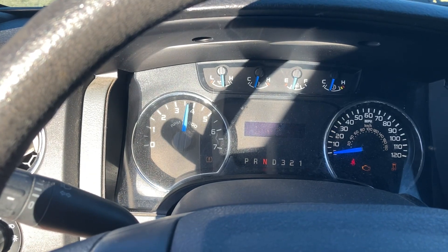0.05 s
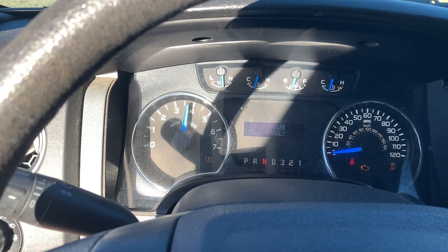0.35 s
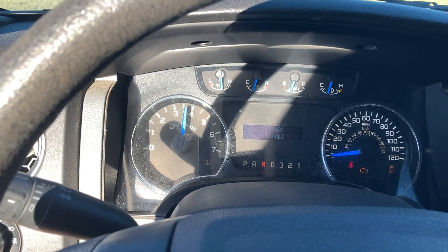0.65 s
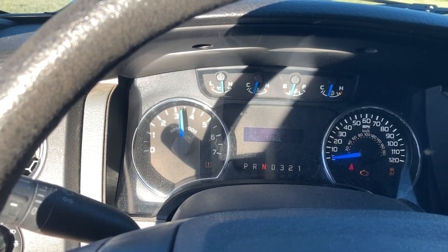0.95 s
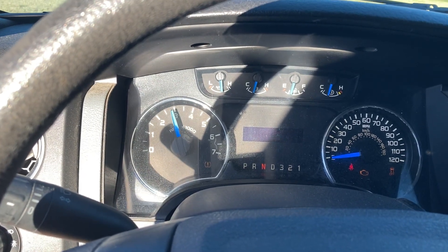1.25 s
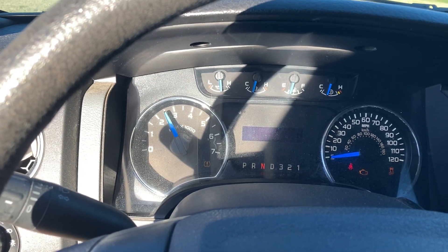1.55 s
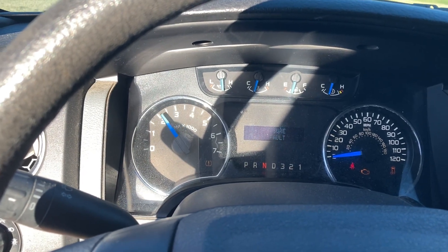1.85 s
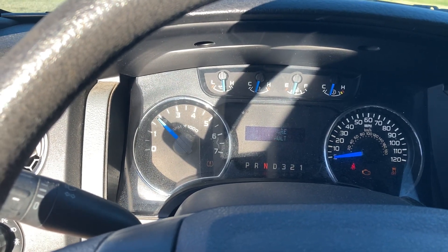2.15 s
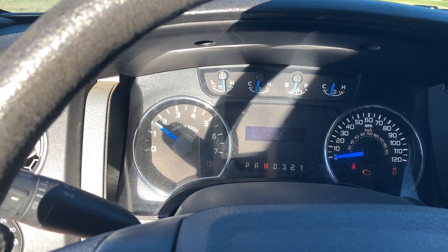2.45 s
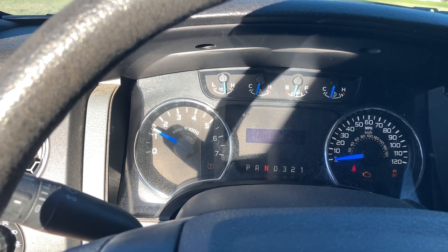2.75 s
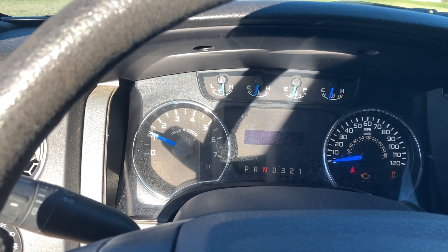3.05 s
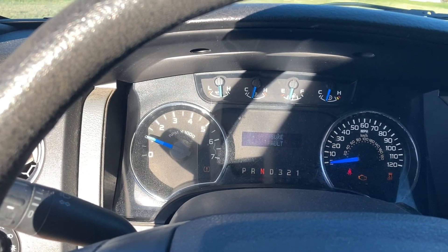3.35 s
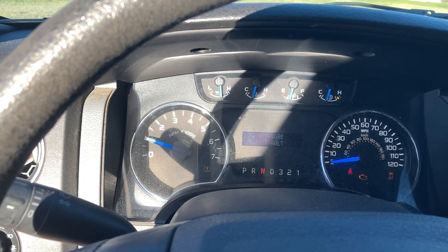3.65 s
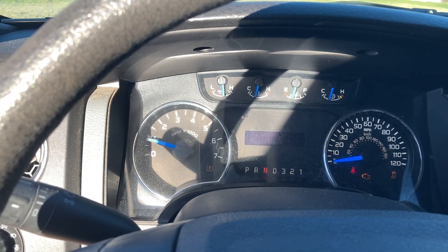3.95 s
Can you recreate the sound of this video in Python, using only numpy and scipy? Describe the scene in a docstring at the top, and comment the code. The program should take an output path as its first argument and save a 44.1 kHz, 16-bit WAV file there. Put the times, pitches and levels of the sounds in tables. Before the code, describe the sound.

A vehicle engine holds high revs with a whining buzz, then the throttle shuts and it winds down to a low idle. Heard from the driver's seat, with a low cabin boom and a few small plastic ticks.

```python
"""A V8 in neutral, taken with a stereo pair at the driver's seat. It opens held at about 3700 rpm:
exhaust orders, valve buzz, belt whines, ringing casings and fan whirr over the cabin's low boom.
Within the first second the throttle shuts; orders and whines sink together and the whirr fades.
From about 1 s, small plastic ticks sound close by, dull puffs of air shake the cabin and the third
order drones. After 2 s the boom comes in lurches as the engine winds down to a 900 rpm idle."""
import sys
import numpy as np
from scipy import signal
from scipy.io import wavfile

SR = 44100
rng = np.random.default_rng(int(sys.argv[2]) if len(sys.argv) > 2 else 0)


def put_to_file(sound):
    """Save the sound as 16-bit audio at rate SR, in the file named by the first command-line argument."""
    columns = np.atleast_2d(sound).T  # one column per channel
    safe = np.clip(columns, -1, 1)
    whole_steps = np.round(safe * 32767)
    wavfile.write(sys.argv[1], SR, whole_steps.astype(np.int16))


N = 176400
T = np.arange(N) / SR
FULL_HZ = 30.8   # four-stroke cycles a second at full speed; an order is a multiple of the cycle rate
RELEASE_S = (.65, .92)   # the throttle closes between these times
RIGHT_LAG_S = 0.00028   # the engine reaches the left microphone first


def from_db(db):
    """Decibels to gain."""
    return 10 ** (np.asarray(db) / 20)


def rms_one(x):
    """Scale to unit rms."""
    return x / np.sqrt(np.mean(x ** 2) + 1e-20)


def in_time(rows):
    """Join (t/s, value) rows by straight lines."""
    return np.interp(T, *np.transpose(rows))


def at_hz(rows, hz):
    """Read every column of a table on a log-frequency axis."""
    f, *columns = np.transpose(rows)
    return [np.interp(np.log(hz), np.log(f), c) for c in columns]


def filtered(x, hz, kind, order=2):
    """Butterworth filter."""
    sos = signal.butter(order, np.clip(hz, 10, .45 * SR), kind, fs=SR, output="sos")
    return signal.sosfilt(sos, x)


def drift(hz):
    """Smooth random wander of spread 1."""
    pole = np.exp(-200 * np.pi * hz / SR)   # one step per 100 samples
    steps = rng.standard_normal(N // 100 + 1002)
    slow = signal.lfilter([1], [1, -2 * pole, pole * pole], steps)[1000:]
    return np.interp(np.arange(N) / 100, np.arange(len(slow)), rms_one(slow))


# The cabin at the microphones: f/Hz, share common to both (0-1), left minus right/dB
CABIN_IMAGE = [(62, 0.85, -3), (129, 0.4, 1.2), (282, 0.99, 0.5), (700, 0.61, 4.5), (1390, 0.37, 1.5),
               (2820, 0.08, -0.5), (5500, 0.7, -0.5), (10100, 1, -0.5)]


def panned(pair, hz):
    """Left-right balance of the cabin at this pitch."""
    return pair * from_db(at_hz(CABIN_IMAGE, hz)[1] * np.array([[.5], [-.5]]))


def stereo_noise(hz):
    """White noise, partly common to both microphones and later on the right."""
    share = at_hz(CABIN_IMAGE, hz)[0]
    common = rng.standard_normal(N)
    direct = np.array([common, np.roll(common, round(RIGHT_LAG_S * SR))])
    diffuse = rng.standard_normal((2, N))
    return panned(np.sqrt(share) * direct + np.sqrt(1 - share) * diffuse, hz)


def tone(cycles, order, db, phase=0):
    """One engine order; reflections scatter its phase between the microphones."""
    hz = order * FULL_HZ
    scatter = (1 - at_hz(CABIN_IMAGE, hz)[0]) * rng.standard_normal((2, 1))
    angle = 2 * np.pi * order * cycles + phase + scatter
    return panned(np.sqrt(2) * from_db(db) * np.sin(angle), hz)


# Leading orders at the seat, swelling as they cross cabin resonances: t/s, level/dB
CRANK_ORDER_2 = [(0, -21), (.18, -62), (.28, -27.5), (.5, -43), (.72, -26.5), (.83, -23), (.93, -40),
                 (1.01, -17), (1.1, -31.5), (1.26, -19.5), (1.43, -47), (2.1, -54.5), (2.5, -43)]
DRONE_ORDER_3 = [(0, -50), (.13, -27), (.55, -30), (.86, -42), (.95, -24), (1.01, -41), (1.09, -23),
                 (1.25, -22.5), (1.38, -15), (1.6, -16.5), (2.0, -14.5), (2.1, -24.5), (2.18, -21),
                 (2.3, -47), (2.8, -42)]
ORDER_6 = [(0, -41.5), (.4, -41.5), (.58, -37), (.8, -40), (.95, -44.5), (1.2, -55), (1.62, -44),
           (1.78, -31.5), (2.0, -29), (2.1, -37), (2.3, -46.5)]
FIRING_ORDER_8 = [(0, -31), (.72, -32.5), (.83, -41.5), (.91, -48.5), (.96, -31.5), (1.04, -37.5),
                  (1.09, -51), (1.15, -38), (1.22, -33), (1.3, -45.5), (1.42, -47.5), (2.0, -40.5),
                  (2.4, -49), (3.3, -55), (4, -37)]
# Lesser orders at full speed, before the load gain: order, level/dB
LESSER_ORDERS = [(4, -43), (5, -45.5), (7, -39), (9, -46), (10, -44.5), (11, -46), (12, -54), (13, -43.5),
                 (14, -54), (15, -55), (16, -52), (17, -55), (18, -60), (23, -56), (24, -55), (29, -59),
                 (45, -59), (47, -58), (64, -60)]
# Lesser orders and valve buzz dip as the throttle closes, then recover: t/s, gain/dB
LOAD_GAIN = [(0, -1), (.5, -1.5), (.72, -2), (.92, -9.5), (4, -1.5)]
ORDER_FALL_DB, WAVER_DB = 22, 2.2   # loss per halving of speed; slow wander in level
ROUGH_DB, ROUGH_RADIANS, ROUGH_HZ = 3.5, .45, 22


def exhaust(cycles, halvings):
    """Orders of the uneven firing pattern throb once a cycle and turn ragged as the throttle shuts."""
    overrun = np.interp(T, RELEASE_S, (0, 1))

    def ragged(order, db, phase=0):
        """One order that stumbles in strength and timing on the overrun."""
        stumble_db = overrun * ROUGH_DB * drift(ROUGH_HZ)
        stumble_phase = overrun * ROUGH_RADIANS * drift(ROUGH_HZ)
        return tone(cycles, order, db + stumble_db, phase + stumble_phase)

    out = tone(cycles, 2, in_time(CRANK_ORDER_2)) + tone(cycles, 3, in_time(DRONE_ORDER_3))
    out += ragged(6, in_time(ORDER_6)) + ragged(8, in_time(FIRING_ORDER_8))
    effort_db = in_time(LOAD_GAIN) - ORDER_FALL_DB * halvings
    for order, db in LESSER_ORDERS:
        out += ragged(order, db + effort_db + WAVER_DB * drift(hz=5), phase=.8 * rng.standard_normal())
    return out


# Buzz through the engine's covers at full speed, before the load gain: f/Hz, level per order/dB
COVER_RESPONSE = [(600, -61), (1000, -64), (1180, -61.5), (1400, -55), (1550, -64.5), (1900, -60),
                  (2600, -69.5), (4000, -80.5)]
BUZZ_FALL_DB = 24   # per halving of speed


def valve_train(cycles, halvings):
    """A comb of high orders; each swells as it slides through the resonance of the engine's covers."""
    effort_db = in_time(LOAD_GAIN) - BUZZ_FALL_DB * halvings
    wavers = [from_db(effort_db + WAVER_DB * drift(hz=3.8)) for _ in range(5)]
    cycle_hz = FULL_HZ / 2 ** halvings[::100]
    out = 0
    for order in range(19, 131):
        cover_db = at_hz(COVER_RESPONSE, order * cycle_hz)[0]
        strength = np.repeat(from_db(cover_db), 100)[:N] * wavers[order % len(wavers)]
        partial = tone(cycles, order, db=1.8 * rng.standard_normal(), phase=rng.uniform(0, 2 * np.pi))
        out += strength * partial
    return out


# Pulley whines at full speed: f/Hz, level/dB, held until t/s
PULLEY_WHINES = [(356, -47.5, .52), (646.5, -51, .36), (1116, -46.5, .76), (1139, -55, .45),
                 (1302, -46, .45), (1879, -60.5, .4), (3400, -67, .5), (3881, -66, .6)]
WHINE_FALL_DB = 14   # per halving of speed
WHINE_DROP_DB, WHINE_FADE_S = 10, .12   # once the hold ends


def belt_drive(cycles, halvings):
    """Pulleys whine at fixed ratios to the crank; each holds, then drops away."""
    ahead = cycles[0] + .7 * (cycles - cycles[0])   # nearly straight ahead of the pair: less lag
    out = 0
    for hz, db, hold_s in PULLEY_WHINES:
        loss_db = WHINE_FALL_DB * halvings + WHINE_DROP_DB * np.clip((T - hold_s) / WHINE_FADE_S, 0, 1)
        whine = np.sqrt(2) * np.sin(2 * np.pi * hz / FULL_HZ * ahead)
        out += panned(whine * from_db(db - loss_db + 1.2 * drift(hz=4)), hz)
    return out


# Casing and panel modes: f/Hz, width/Hz, unloaded level at full speed/dB, loss per halving of speed/dB
CASING_MODES = [(200, 5, -43, 9), (342.3, 26, -56, 1), (582.5, 13, -58, 6), (691, 110, -56, 7),
                (1086, 22, -56, 7.5), (1235, 100, -55, 10.5), (1312, 63, -47.5, 9), (1540, 100, -68.5, 8),
                (1830, 110, -61.5, 8), (2040, 150, -64, 6.5), (2462, 160, -60, 12.5), (2844, 110, -70, 6),
                (3040, 22, -69, 5.5), (3385, 76, -65.5, 7), (3890, 60, -65.5, 13), (4594, 110, -63.5, 10.5),
                (4650, 83, -77.5, 13)]
SHAKE_DEPTH, CASING_SWELL_DB, CASING_LOADED_DB = 0.44, 2.5, -4.5


def casing(cycles, halvings):
    """Each firing shakes the metal parts, which ring at the same pitches at any speed."""
    shake = 1 + SHAKE_DEPTH * np.cos(2 * np.pi * 8 * cycles)
    out = 0
    for hz, width_hz, db, fall_db in CASING_MODES:
        edges = [hz - width_hz / 2, hz + width_hz / 2]
        ring = filtered(stereo_noise(hz) * shake, edges, "band", order=1)
        ring = filtered(ring, [hz / 1.1, hz * 1.1], "band", order=1)
        out += from_db(db - fall_db * halvings + CASING_SWELL_DB * drift(hz=4)) * rms_one(ring)
    return out * from_db(np.interp(T, RELEASE_S, (CASING_LOADED_DB, 0)))   # looser off the throttle


# Fan and valve-train noise: f/Hz, level in 1 Hz at full speed/dB, loss per halving of speed/dB
WHIRR_SPECTRUM = [(103, -56, 6), (151, -61, 9.5), (200, -70, 3), (308, -71.5, 5.5), (570, -77.5, 7),
                  (760, -75.5, 5.5), (1020, -73.5, 13), (1320, -76, 11.5), (1840, -80.5, 10.5),
                  (2950, -87, 12.5), (4230, -92, 12.5), (6050, -96, 15.5), (7200, -98.5, 15),
                  (10700, -103, 14.5), (15700, -107, 13.5)]
# Rise and fall on top of that spectrum: t/s, gain/dB
WHIRR_GAIN = [(0, 0), (.4, -0.5), (.9, 2), (1.4, 1.5), (2.0, 2), (2.4, 1), (3.0, 0), (3.19, 3), (3.22, 1),
              (3.26, 4), (3.5, 4), (4, 5.5)]
FLICKER_DB, FLICKER_HALVED_HZ = 2.56, 21000   # higher bands are smoother


def whirr(cycles, halvings):
    """Fan and mechanical noise, pulsing with the firings and duller as the speed falls."""
    edges = 80 * 2 ** np.arange(0, 7.8, 1 / 3)   # third octaves
    out = 0
    for low, high in zip(edges, edges[1:]):
        hz = np.sqrt(low * high)
        db, fall_db = at_hz(WHIRR_SPECTRUM, hz)
        band = filtered(stereo_noise(hz), [low, high], "band", order=3) * np.sqrt(SR / 2)
        flicker_db = FLICKER_DB * drift(hz=22) / (1 + hz / FLICKER_HALVED_HZ)
        out += band * from_db(db - fall_db * halvings + flicker_db)
    firing_pulse = 0.056 * np.cos(2 * np.pi * 8 * cycles)
    cycle_throb = 0.076 * np.cos(2 * np.pi * cycles)
    return out * from_db(in_time(WHIRR_GAIN)) * (1 + firing_pulse + cycle_throb)


# Boom around the microphones, smooth up to 2.1 s and lurching after: t/s, level/dB
BOOM_SMOOTH = [(0, -37), (.6, -31), (1.0, -30), (1.25, -29), (1.45, -34), (1.9, -33), (2.1, -27)]
BOOM_LURCHING = [(2.2, -26), (2.22, -29.5), (2.28, -25.5), (2.354, -44.5), (2.53, -20.5), (2.6, -35.5),
                 (2.66, -20.5), (2.736, -29.5), (2.766, -46), (2.846, -28.5), (2.9, -38.5), (2.966, -30),
                 (2.992, -37), (3.146, -22.5), (3.176, -46), (3.236, -49), (3.288, -32), (3.362, -43),
                 (3.462, -35), (3.528, -36.5), (3.588, -26), (3.794, -37), (3.814, -70), (3.858, -49),
                 (3.904, -26.5), (4.0, -37.5)]
BOOM_HZ, BOOM_WIDTH_HZ, BOOM_EVENNESS = 58.56, 22.8, 0.41


def cabin_boom():
    """The cabin's lowest air resonance, stirred at random."""
    edges = [BOOM_HZ - BOOM_WIDTH_HZ / 2, BOOM_HZ + BOOM_WIDTH_HZ / 2]
    ring = signal.hilbert(filtered(stereo_noise(BOOM_HZ), edges, "band"))
    swell = np.sqrt(np.mean(np.abs(ring) ** 2, axis=0))
    evened = ring.real / (swell + 0.041 * swell.mean()) ** BOOM_EVENNESS
    evened = filtered(evened, [BOOM_HZ / 2, 2 * BOOM_HZ], "band")
    return rms_one(evened) * from_db(in_time([*BOOM_SMOOTH, *BOOM_LURCHING]))


# Ticks close to the microphones: t/s, level before filtering/dB, lower f/Hz, upper f/Hz, t60/s
CLOSE_TICKS = [(.939, -40.5, 2000, 5000, .018), (1.084, -37, 2200, 18000, .007),
               (1.27, -54, 4000, 16000, .01), (1.446, -42, 900, 6000, .014), (2.346, -51, 900, 6000, .016),
               (2.633, -48, 900, 7000, .016), (2.645, -58, 1500, 7000, .012),
               (3.185, -39.5, 600, 2300, .018), (3.186, -50, 4000, 14000, .007),
               (3.192, -47, 700, 2600, .03)]


def plastic_ticks():
    """Tiny dry contacts of plastic that die at once."""
    out = 0
    for start_s, db, low_hz, high_hz, t60 in CLOSE_TICKS:
        decay = (T >= start_s) * from_db(-60 * np.clip((T - start_s) / t60, 0, 3))
        burst = filtered(stereo_noise(high_hz) * decay, [low_hz, high_hz], "band", order=1)
        burst = filtered(burst, 2 * high_hz, "low", order=1)
        out += from_db(db) * np.sqrt(SR / 2 / high_hz) * burst
    return filtered(out, 400, "high")   # nothing deeper rings in them


# Dull puffs in the cabin: centre t/s, half length/s, level/dB, upper f/Hz
CABIN_PUFFS = [(1.014, 0.046, -29, 147), (1.225, 0.036, -35.5, 258), (1.356, 0.012, -27.5, 175),
               (1.5, .07, -33, 110), (1.65, 0.04, -37, 199), (1.89, 0.044, -36, 132),
               (2.077, 0.043, -23.5, 190), (2.25, 0.027, -32, 170), (2.532, 0.019, -24.5, 108),
               (2.644, 0.0089, -21, 182), (2.696, 0.035, -33.5, 175), (3.042, 0.014, -42, 227),
               (3.068, 0.018, -35, 150), (3.123, 0.0096, -27, 155)]
PUFF_LOW_HZ = 71


def air_puffs():
    """Short swells of low turbulence."""
    out = 0
    for centre_s, half_s, db, high_hz in CABIN_PUFFS:
        swell = np.exp(-.5 * ((T - centre_s) / half_s) ** 2)
        air = filtered(stereo_noise(high_hz), high_hz, "low", order=3)
        puff = filtered(air, PUFF_LOW_HZ, "high") * swell
        crest_rms = np.sqrt(np.mean(puff ** 2) / np.mean(swell ** 2))
        out += from_db(db) * puff / crest_rms
    return out


# Engine speed, held and then winding down: t/s, four-stroke cycle rate f/Hz
CYCLE_RATE = [(0, 30.75), (.42, 30.8), (.6, 30.2), (.74, 29.4), (.86, 27.8), (1.0, 26.2), (1.09, 25.0),
              (1.24, 23.5), (1.43, 21.7), (1.7, 19.0), (2.0, 16.7), (2.3, 14.6), (3.0, 10.4), (3.5, 8.5),
              (4, 7.5)]
SPEED_JITTER = 0.0007


def scene():
    """From the driver's seat: one speed drives every turning part, and the cabin adds its own sounds."""
    cycle_hz = in_time(CYCLE_RATE)
    left_cycles = np.cumsum(cycle_hz * (1 + SPEED_JITTER * drift(hz=10))) / SR
    cycles = np.array([left_cycles, left_cycles - RIGHT_LAG_S * cycle_hz])
    halvings = np.log2(FULL_HZ / cycle_hz)   # octaves below full speed
    engine = sum(part(cycles, halvings) for part in (exhaust, valve_train, belt_drive, casing, whirr))
    return engine + cabin_boom() + air_puffs() + plastic_ticks()


def record(dry):
    """The recorder thins the deepest rumble and cuts the top steeply."""
    top_cut = signal.ellip(10, .1, 80, 15800, fs=SR, output="sos")
    return signal.sosfilt(top_cut, filtered(dry, 28, "high"))


dry = scene()
out = record(dry)
put_to_file(out)
```